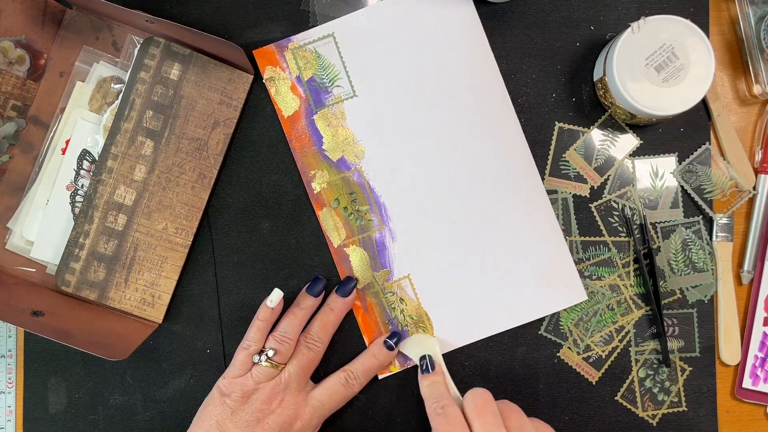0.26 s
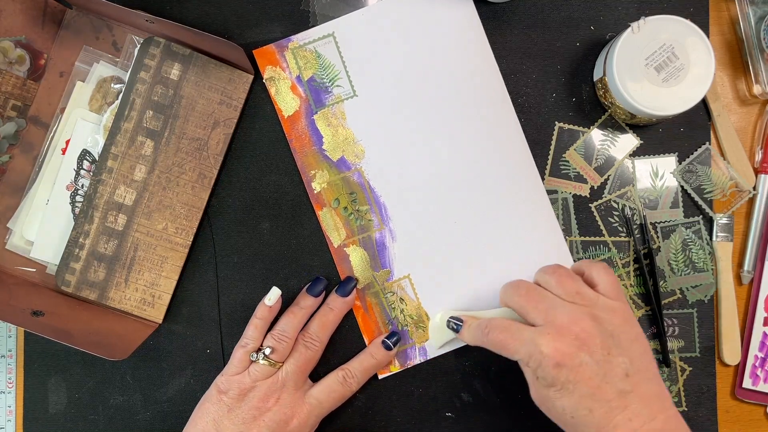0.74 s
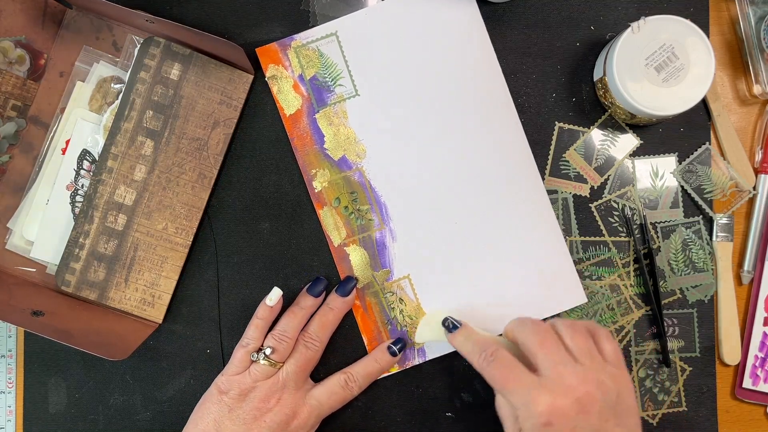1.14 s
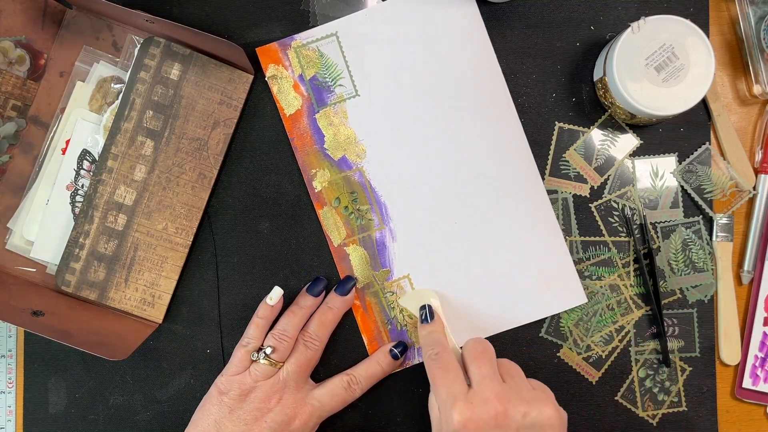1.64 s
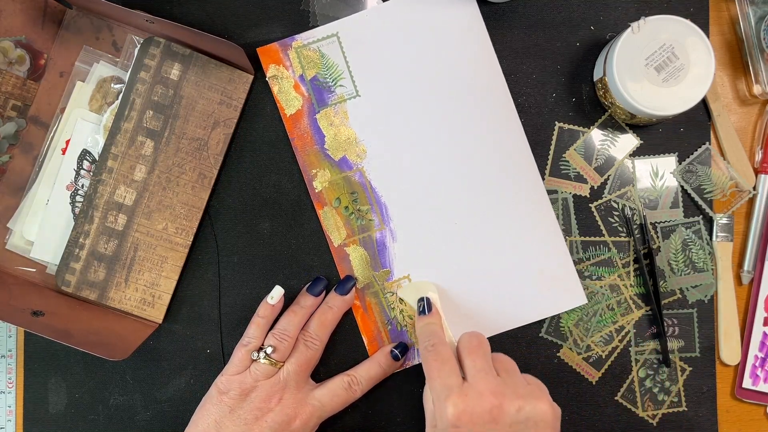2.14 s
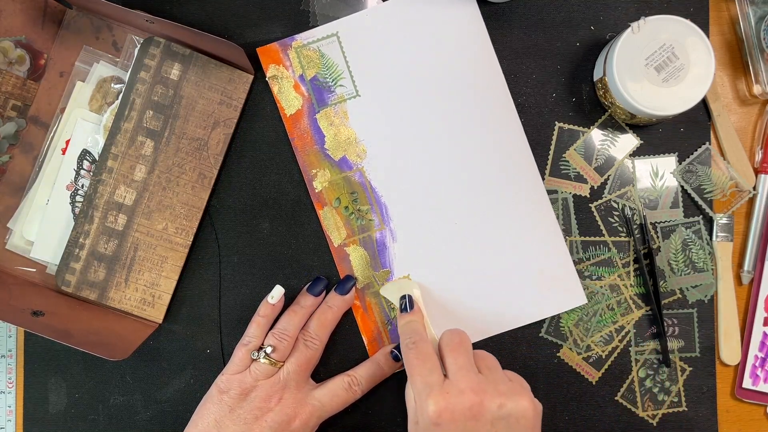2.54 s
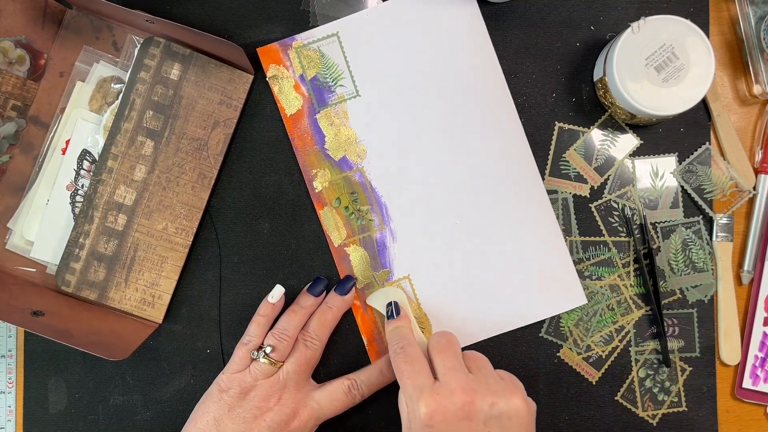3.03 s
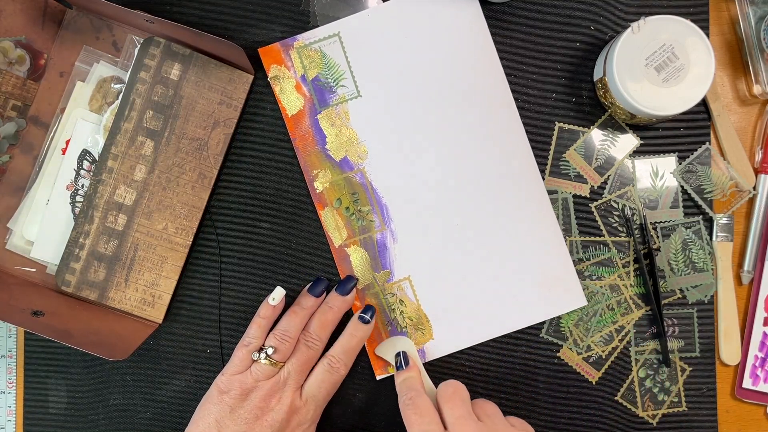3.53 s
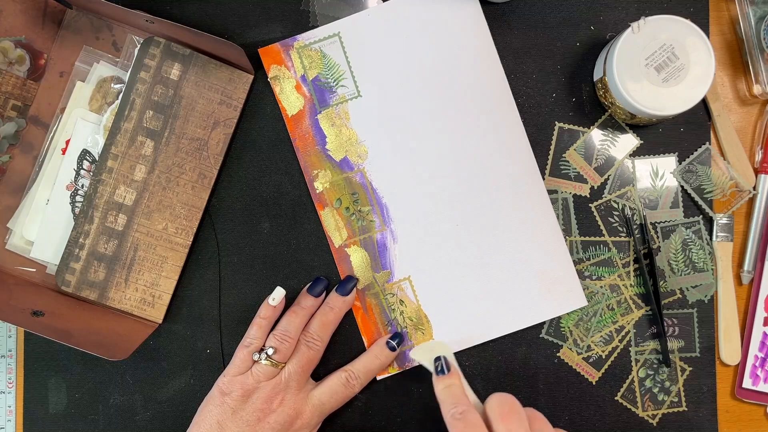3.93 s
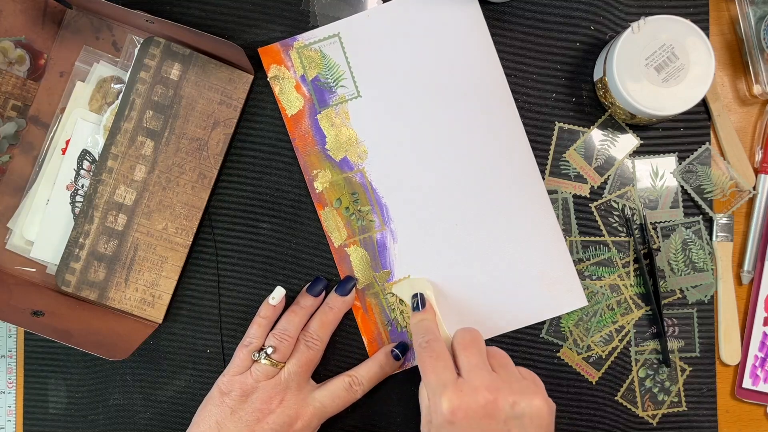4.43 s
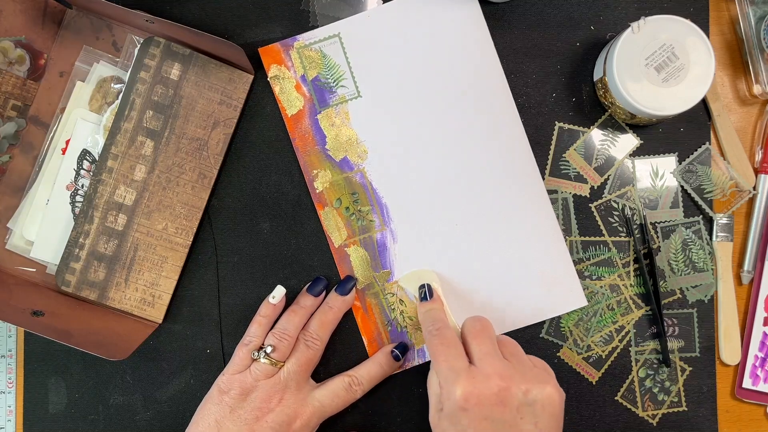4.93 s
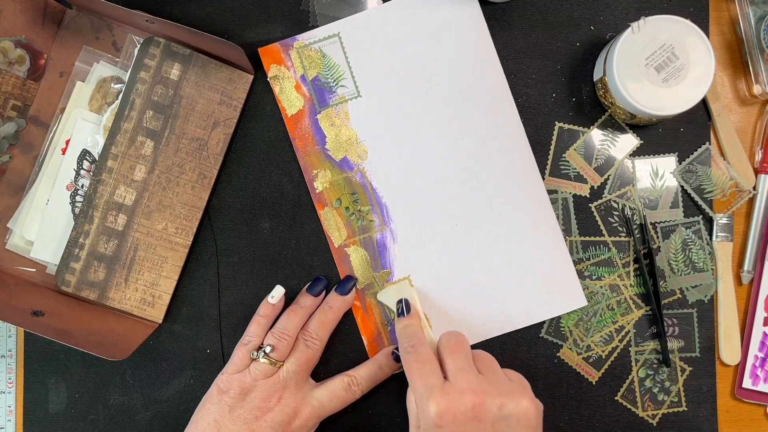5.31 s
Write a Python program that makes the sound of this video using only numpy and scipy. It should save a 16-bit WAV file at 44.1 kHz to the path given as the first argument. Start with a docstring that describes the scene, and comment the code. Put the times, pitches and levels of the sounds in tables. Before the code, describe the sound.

Soft, raspy strokes of a plastic burnisher on a paper page, dotted with sharp little taps, over a low room rumble.

```python
"""Burnishing a sticker

A plastic burnisher scrubs to and fro over a sticker on a paper page that lies on a desk mat.
Each stroke drags over the fibres with a rasp and a gritty hiss, and the edge gives a few tiny squeaks.
Tool and fingernails tick on the page; tool and hand bump the desk through the mat.
A fan hums in the small room, and a deep rumble drifts under everything."""
import sys
import numpy as np
from scipy import signal
from scipy.fft import rfft, irfft, next_fast_len
from scipy.io import wavfile
from scipy.ndimage import uniform_filter1d

SR = 44100
rng = np.random.default_rng(int(sys.argv[2]) if len(sys.argv) > 2 else 0)


def waveform_to_disk(signal):
    """Save audio, clipped to [-1, 1], as 16-bit WAV at the path in sys.argv[1]."""
    frames = np.transpose(np.atleast_2d(signal))
    scaled = np.clip(frames, -1, 1) * 32767
    samples = np.round(scaled).astype(np.int16)
    wavfile.write(sys.argv[1], SR, samples)


N = 245455
TIME = np.arange(N) / SR

# one-off wipes and quick skids: middle t/s, length/s, level/dB, hiss over rasp/dB, page f/Hz
WIPES = [(0.001, 0.17, -54, 0, 2800), (.25, 0.52, -63.5, -3.5, 2700), (0.254, .025, -60, -3, 2700),
         (0.438, 0.18, -60, 0.5, 2400), (0.604, 0.13, -58.5, -2.5, 2400), (0.76, 0.18, -54.5, -3.5, 2400),
         (0.902, 0.068, -58, -5.5, 2400), (1.04, 0.18, -62, -4, 2400), (1.158, 0.029, -54, 0.5, 2400),
         (1.215, 0.055, -64, -2, 2400), (1.42, 0.16, -55, 0.5, 2330), (3.013, 0.061, -66, 0, 3300),
         (3.359, 0.52, -61, -2, 3870), (3.623, 0.44, -61.5, -0.5, 3600), (3.817, 0.1, -54, 1, 1230),
         (3.916, 0.03, -59.5, 5, 1250), (4.005, 0.16, -58, -1.5, 1200), (4.08, 0.016, -53.5, 5, 1200),
         (4.232, 0.28, -58, -1.5, 2410), (5.034, 0.022, -53, -2, 5300), (5.548, 0.11, -55.5, -3, 1500)]
# scrubbing, a row per round trip: start t/s, length/s, push level/dB, pull level/dB,
# push hiss over rasp/dB, pull hiss over rasp/dB
ROUND_TRIPS = [(1.435, 0.28, -57, -58.5, -4, -3.5), (1.712, 0.28, -53.5, -58, -4, -3.5),
               (1.961, 0.28, -58.5, -54.5, -1, -0.5), (2.262, 0.25, -56, -55.5, -6, -2),
               (2.517, 0.2, -60.5, -56, -4.5, -3), (2.754, 0.24, -58.5, -61, -5, -3),
               (4.271, .285, -58, -58, -6, -3.5), (4.555, 0.35, -57.5, -56.5, -4, -5),
               (4.861, 0.27, -59, -54.5, 0.5, -1.5), (5.165, 0.33, -59, -54, -5, -2.5)]
# a long push, then a quicker pull: middle/trip, length/trip, fastest point/stroke, page f/Hz
PUSH_AND_PULL = [(.26, .54, 0.51, 2290), (.73, .42, 0.36, 2450)]
def strokes():
    """The hand's moves: single wipes, fastest halfway, and the push and pull of each round trip."""
    for wipe in WIPES:
        yield *wipe, .5
    for start, trip_s, push_db, pull_db, *hiss_dbs in ROUND_TRIPS:
        for shape, db, hiss_db in zip(PUSH_AND_PULL, (push_db, pull_db), hiss_dbs):
            middle, length, fastest, hz = shape
            yield start + middle * trip_s, length * trip_s, db, hiss_db, hz, fastest


# EQ of the rasp, the body of a stroke: f/Hz, level/dB
RASP_EQ = [(200, -4), (500, -4.5), (1000, -7), (1500, 0.5), (2000, -5.5), (3500, -2), (4600, -4),
           (5600, -6), (7500, -11.5), (10000, -18.5), (16000, -46)]
# EQ of the bright hiss on top: f/Hz, level/dB
HISS_EQ = [(2000, -39), (5500, -6.5), (7400, 0), (8800, 3), (10000, 4.5), (11900, 5), (13500, 1.5),
           (16000, -7.5)]
# resonances of the tool pressed on the page: f/Hz, width/Hz, level/dB
TOOL_RESONANCES = [(1550, 760, -11.5), (2330, 350, -8), (3210, 260, -13), (4230, 480, -7.5),
                   (5250, 360, -10.5), (6120, 330, -3.5)]
def rubbing():
    """The tool drags over fibres: pressure gives a rasp, the light edge a high, gritty hiss."""
    rasp, hiss = np.zeros((2, N))
    patch_hz = np.geomspace(800, 16000, num=20)
    for middle, length, db, hiss_db, page_hz, fastest in strokes():
        span = np.abs(TIME - middle) < length / 2
        progress = (TIME[span] - middle) / length + .5
        ramp = np.interp(progress, [0, fastest, 1], [0, 1, 0])
        speed = np.sin(np.pi / 2 * ramp) ** 1.24
        # each stroke meets another patch of paper with its own colour
        patch_eq = np.transpose([patch_hz, 2 * rng.standard_normal(len(patch_hz))])
        slips = colour(fibres(per_s=9000, spread_db=0.1)[:len(speed)], patch_eq)
        grit = fibres(per_s=690, spread_db=-3.5)[:len(speed)]  # coarse specks crackle
        drag = speed * level(slips, 0)
        # the page resonates at a pitch set by where it is pressed
        rasp[span] += undb(db) * resonate(drag, [(page_hz, 0.21 * page_hz, -6)])
        hiss[span] += undb(db + hiss_db) * (drag + undb(-13) * speed * grit)
    grip = undb(wander(130))  # the edge judders over ridges of paint and sticker
    body = undb(4) * resonate(colour(rasp, RASP_EQ), TOOL_RESONANCES)
    return grip * (body + colour(hiss, HISS_EQ))


def fibres(per_s, spread_db):
    """One second of tiny, uneven slips as paper fibres catch and let go."""
    slips = (rng.random(SR) < per_s / SR) * rng.standard_normal(SR)
    size_db = spread_db * np.minimum(rng.exponential(size=SR), 5)
    return level(slips * undb(size_db), 0)


# chirps of the edge on the sticker: middle t/s, length/s, f/Hz, level/dB
SQUEAKS = [(.783, .016, 13200, -62), (.812, .028, 1090, -55.5), (1.178, 0.016, 13200, -56)]
def squeaks(wobble_hz=90):
    """For a moment the edge sticks and slips at an almost even rate."""
    out = np.zeros(N)
    for middle, length, hz, db in SQUEAKS:
        swell = np.cos(np.pi * np.clip((TIME - middle) / length, -.5, .5))
        phase = 2 * np.pi * np.cumsum(hz + wobble_hz * wander(540)) / SR
        out += undb(db) * swell * np.sin(phase)
    return out


# the tool is set down, a tick layered with a bump: t/s, tick level/dB, tilt/dB per two octaves,
# snap f/Hz, ping f/Hz, ping level/dB, bump level/dB, bump tilt/dB per octave, knock f/Hz,
# settling knock over bump/dB, settling f/Hz
TOOL_TAPS = [(0.1677, -26.5, 3, 2960, 13500, -7, -55.5, 0, 600, 3, 310),
             (1.252, -24, -4.5, 3440, 10000, 1, -48.5, -1.5, 594, -3, 240),
             (2.2544, -40, -10, 2000, 11000, -20, -56.5, -0.5, 600, 4, 240),
             (3.053, -22.5, 1.5, 3730, 5500, 5, -56, -1, 250, -6, 160),
             (3.993, -30.5, 3.5, 3730, 13000, 0, -49.5, 8.5, 1140, 0, 432),
             (5.5133, -66, -11, 2010, 12000, -18, -52, 2, 620, -4.5, 340)]
# light fingernail clicks: t/s, level/dB, tilt/dB per two octaves, snap f/Hz, ping f/Hz,
# ping level/dB, ring level/dB
NAIL_CLICKS = [(0.7757, -42.5, 8, 11000, 13200, 0, -8.5), (1.136, -30.5, 3, 3400, 6840, -6, -13),
               (1.1365, -41, 9, 6800, 11900, 5, -10), (1.1514, -34.5, -2, 2360, 14200, 10, -11.5),
               (2.6958, -37.5, 0, 5370, 12500, 3, -8), (2.9746, -46, 8, 13000, 13500, -3, -7),
               (3.437, -45, 0, 4030, 12000, -3, -7), (3.8465, -39, 5, 9000, 13500, 0, -4),
               (4.0714, -36, -3, 3150, 13000, 11, -7), (5.393, -30.5, 2, 8300, 12500, -6, -11)]
# ring of tool and page: f/Hz, level/dB, t60/s
RING_MODES = [(1164, 2, 0.051), (1550, 9.5, 0.017), (2262, -1, 0.073), (3420, 1.5, 0.016), (3680, 1, 0.011),
              (3910, 2, 0.016), (5400, 0.5, 0.013), (6440, 1.5, 0.029), (9600, -4, 0.026),
              (12300, 9, 0.0068), (13500, -1, 0.019)]
# EQ of a tick: f/Hz, level/dB
TICK_EQ = [(200, -24.5), (900, -0.5), (2000, -2), (3600, 0), (5400, -0.5), (8500, -1.5), (12000, 0),
           (16000, 3)]
def ticks(tap_ring_db=-6, ping_width_hz=1900):
    """A hard contact snaps once, rings tool and page, and scatters off the things on the desk."""
    out, t = np.zeros(N), TIME[:4096]
    contacts = [(*tap[:6], tap_ring_db) for tap in TOOL_TAPS] + list(NAIL_CLICKS)
    for start, db, tilt_db, snap_hz, ping_hz, ping_db, ring_db in contacts:
        snap = 0.34 * rng.standard_normal(len(t)) * fade(t, t60=0.0019)
        snap[0] = 1
        snap /= np.linalg.norm(snap)
        # every place of contact detunes and weights the modes a little differently
        detunes = .012 * rng.standard_normal(len(RING_MODES))
        weights_db = 2 * rng.standard_normal(len(RING_MODES))
        ring = sum(undb(mode_db + weight_db) * fade(t, t60) * np.sin(2 * np.pi * hz * (1 + detune) * t)
                   for (hz, mode_db, t60), detune, weight_db in zip(RING_MODES, detunes, weights_db))
        scatter = rng.standard_normal(len(t)) * fade(t, t60=0.043)
        hit = undb(5.5) * snap + undb(ring_db) * (undb(-23) * ring + undb(-13.5) * scatter)
        # the way the edge lands colours the snap; a thin, high ping sits on top
        hit = resonate(hit, [(snap_hz, 0.34 * snap_hz, 2), (ping_hz, ping_width_hz, ping_db)])
        add(out, start, undb(db) * colour(hit, TICK_EQ, tilt_db=tilt_db / 2, pivot_hz=6940))
    return out


# soft bumps as the tool turns or the hand shifts: t/s, level/dB, tilt/dB per octave, knock f/Hz
TURNS = [(1.576, -59, -3.5, 350), (1.71, -53.5, -2, 716), (1.881, -61, 6, 700), (1.983, -53.5, -3.5, 730),
         (2.042, -66, -2.5, 403), (2.514, -58.5, 2.5, 322), (2.749, -55.5, 1, 560), (3.177, -68, -6, 380),
         (4.556, -55.5, -3, 500), (4.869, -58, -4.5, 523), (5.169, -56.5, -2.5, 260)]
def knocks(settle_s=.007, settle_tilt_db=-1):
    """Every tap and turn knocks twice: the tool lands, then settles into the mat at a lower pitch."""
    tap_shudder, turn_shudder = (-21, 0.049), (-5, 0.15)  # level/dB, t60/s
    landings = [(tap[0], *tap[6:], tap_shudder) for tap in TOOL_TAPS]
    landings += [(start, db, tilt_db, hz, -4, 0.54 * hz, turn_shudder)
                 for start, db, tilt_db, hz in TURNS]
    for start, db, tilt_db, hz, settle_db, settle_hz, shudder in landings:
        yield start, db, tilt_db, hz, *shudder
        yield start + settle_s, db + settle_db, settle_tilt_db, settle_hz, *shudder


# EQ of a muffled bump: f/Hz, level/dB
BUMP_EQ = [(40, -32), (120, 0.5), (240, 1.5), (400, -0.5), (750, -4.5), (1300, -15), (2500, -30),
           (6000, -34.5), (16000, -82)]
# dead ring of the desk under its mat: f/Hz, width/Hz, level/dB
DESK_RESONANCES = [(258, 50, -3.5), (343, 44, -0.5), (810, 100, -9), (1190, 59, 3.5)]
def bumps(rms_span_s=.03):
    """The tool pushes the page into the mat: a dull knock and a short shudder."""
    out, t = np.zeros(N), TIME[:8192]
    for start, db, tilt_db, hz, shudder_db, t60 in knocks():
        push = undb(shudder_db) * rng.standard_normal(len(t)) * fade(t, t60)
        push[0] += 1
        muffled = colour(push, BUMP_EQ, tilt_db=tilt_db, pivot_hz=404)
        spot = (hz, 0.44 * hz, 1.5)  # a broad pitch set by where the tool presses
        knock = resonate(muffled, [*DESK_RESONANCES, spot])
        rms = np.sqrt(np.sum(knock ** 2) / (rms_span_s * SR))
        add(out, start, undb(db) * knock / rms)
    return out


# thuds of the heel of the hand: middle t/s, length/s, level/dB
HAND_THUDS = [(0.798, 0.24, -55.5), (1.429, 0.1095, -55.5), (1.998, .08, -51.5), (2.271, 0.0795, -55),
              (2.725, 0.32, -63), (3.037, 0.058, -53), (4.57, 0.098, -61)]
# EQ of the desk's low end: f/Hz, level/dB
DESK_BASS_EQ = [(20, -22), (50, 5.5), (95, 8), (130, -4.5), (220, -32.5), (600, -46), (2000, -82)]
def thuds():
    """The soft heel of the hand rolls onto the mat and stirs only the bass of the desk."""
    out = np.zeros(N)
    for middle, length, db in HAND_THUDS:
        swell = np.hanning(int(length * SR))
        bass = colour(rng.standard_normal(SR // 2), DESK_BASS_EQ)[-len(swell):]
        add(out, middle - length / 2, level(swell * bass, db))
    return out


# fan tones: multiple of the shaft rate, level/dB
FAN_TONES = [(9, -96), (10, -76.5), (11, -66.5), (12, -70.5), (13, -65), (16, -85), (17, -80.5), (20, -80)]
# motor hum: f/Hz, level/dB
MOTOR_HUM = [(98, -59), (199.8, -64.5)]
# EQ of the moving air: f/Hz, level/dB
AIR_EQ = [(80, 4), (130, 4.5), (180, 0), (250, -1), (300, -5), (380, -1), (460, -5.5), (600, -7),
          (700, -9.5), (830, -8), (1100, -12), (2000, -15), (6000, -21.5), (12000, -21.5), (16000, -28)]
def fan(shaft_hz=46.95):
    """Harmonics of the turning shaft and the motor's hum waver over a rush of air."""
    shaft = 2 * np.pi * shaft_hz * np.cumsum(1 + 0.00282 * wander(12)) / SR
    tones = sum(undb(db + 2 * wander(9.8)) * np.sin(harmonic * shaft + 2 * np.pi * rng.random())
                for harmonic, db in FAN_TONES)
    hum = sum(undb(db + 2.2 * wander(3.3)) * np.sin(2 * np.pi * hz * TIME + 0.52 * wander(10))
              for hz, db in MOTOR_HUM)
    air = level(colour(rng.standard_normal(N), AIR_EQ), db=-56)
    return tones + hum + air


# how heavily the hands lean on the desk: t/s, level/dB
HAND_LEAN = [(0, 1.5), (.4, -5), (1.0, -0.5), (2.2, -1), (2.7, 3.5), (3.02, 1.5), (3.12, -3.5), (3.5, -7),
             (4.6, 1.5), (4.95, -1.5), (5.57, -0.5)]
# EQ of the sub-bass bed: f/Hz, level/dB
RUMBLE_EQ = [(1, -1), (4, -1.5), (9, 0.5), (15, -12), (25, -23), (45, -19.5), (60, -31), (82, -38.5),
             (110, -38), (200, -64.5), (500, -90), (2000, -120)]
def rumble(surge_db=3.5, surge_s=.017):
    """A deep rumble grows when the hands lean on the desk and surges at every bump."""
    surges = np.max([np.exp(-((TIME - start) / surge_s) ** 2) for start, *_ in knocks()], axis=0)
    lean_db = np.interp(TIME, *np.transpose(HAND_LEAN))
    bed = colour(rng.standard_normal(N), RUMBLE_EQ)
    return level(bed * undb(lean_db + surge_db * surges), db=-31.5)


def room(x, wet_db, t60):
    """Nearby walls return a short, soft tail after a 6 ms pre-delay."""
    t = TIME[:16384]
    reflections = rng.standard_normal(len(t)) * fade(t, t60) * (t > .006)
    tail = colour(reflections, [(200, -8), (1000, 8.5), (3000, 7.5), (15000, 3.5)])
    return x + undb(wet_db) * signal.fftconvolve(x, tail / np.linalg.norm(tail))[:N]


def resonate(x, modes):
    """The direct sound plus resonances given as (f/Hz, width/Hz, level/dB)."""
    return x + sum(undb(db) * signal.lfilter(*signal.iirpeak(hz, hz / width, fs=SR), x)
                   for hz, width, db in modes)


def colour(x, points, tilt_db=0, pivot_hz=1000):
    """Minimum-phase EQ through (f/Hz, level/dB) points, tilted by dB per octave."""
    size = 2 * next_fast_len(len(x))
    hz = np.maximum(np.arange(size // 2 + 1) * SR / size, .5)
    point_hz, point_db = np.transpose(points)
    gain_db = np.interp(np.log(hz), np.log(point_hz), point_db)
    gain_db += tilt_db * np.log2(np.maximum(hz, point_hz[0]) / pivot_hz)
    cepstrum = irfft(gain_db * np.log(10) / 20)
    cepstrum[1:size // 2] *= 2  # folded forward, so nothing rings ahead of an attack
    cepstrum[size // 2 + 1:] = 0
    return irfft(rfft(x, size) * np.exp(rfft(cepstrum)))[:len(x)]


def wander(rate_hz):
    """Smooth random modulation with unit rms."""
    hold = max(int(SR / rate_hz), 1)
    steps = np.repeat(rng.standard_normal(N // hold + 1), hold)
    return level(uniform_filter1d(uniform_filter1d(steps, hold), hold)[:N], 0)


def fade(t, t60):
    """Exponential decay, 60 dB down after t60."""
    return np.exp(-np.log(1000) * t / t60)


def undb(db):
    """Decibels to gain."""
    return 10 ** (np.asarray(db) / 20)


def level(x, db):
    """Scale to an rms level."""
    return x * undb(db) / np.sqrt(np.mean(x ** 2))


def add(out, start_s, sound):
    """Mix a sound in at a time."""
    i = max(int(start_s * SR), 0)
    out[i:i + len(sound)] += sound[:max(N - i, 0)]


def scene():
    """Handwork on the desk in a small room, over fan and rumble, in mono."""
    handwork = rubbing() + squeaks() + ticks() + bumps() + thuds()
    return (room(handwork, wet_db=-16, t60=0.12) + fan() + rumble())[None]


def record(dry):
    """The sound eases in and out over 6 ms, and a steep low-pass cuts the top."""
    ease = np.clip(np.minimum(TIME, TIME[-1] - TIME) / .006, 0, 1)
    top_hz = 15900
    return signal.sosfilt(signal.ellip(10, .2, 70, top_hz, fs=SR, output="sos"), dry * ease)


dry = scene()
out = record(dry)
waveform_to_disk(out)
```